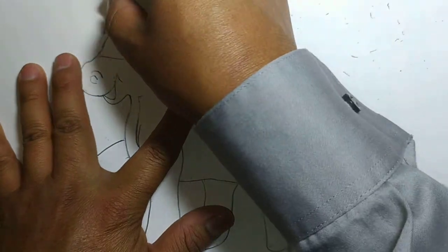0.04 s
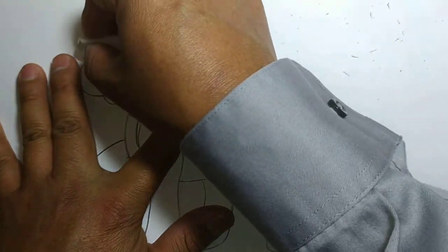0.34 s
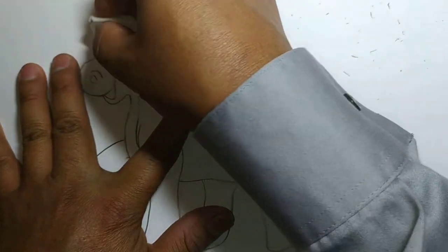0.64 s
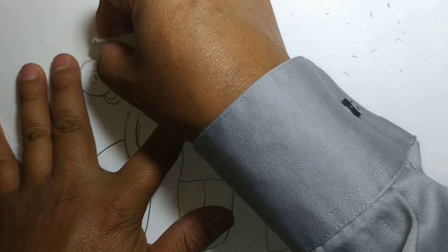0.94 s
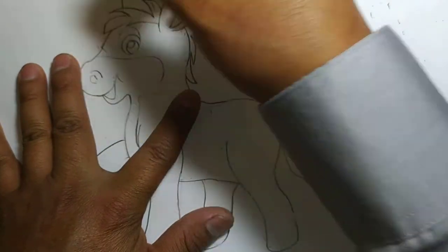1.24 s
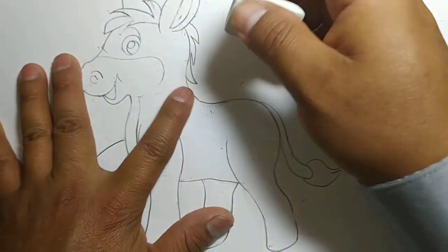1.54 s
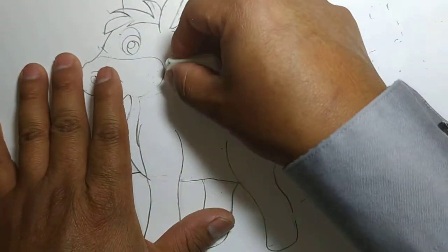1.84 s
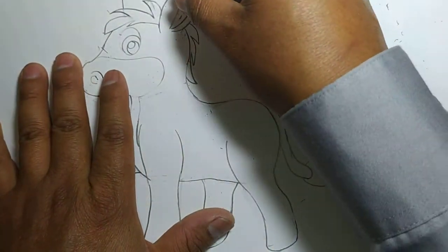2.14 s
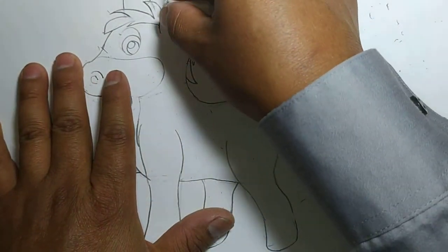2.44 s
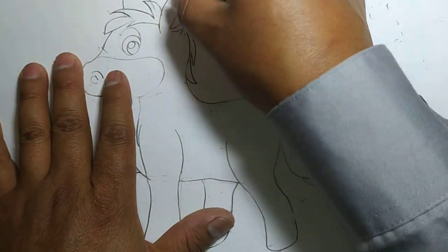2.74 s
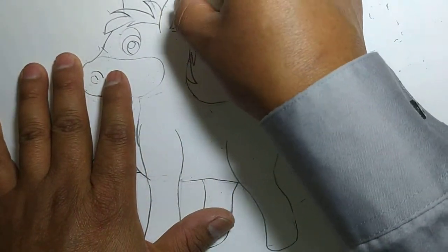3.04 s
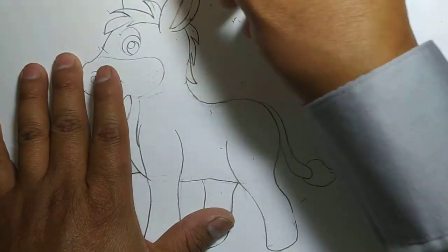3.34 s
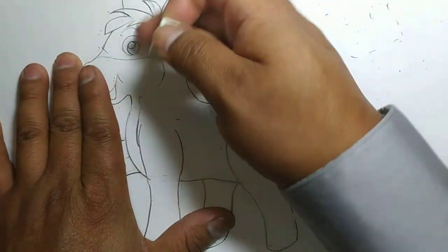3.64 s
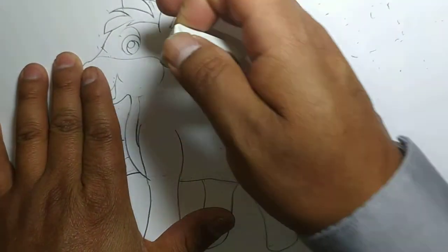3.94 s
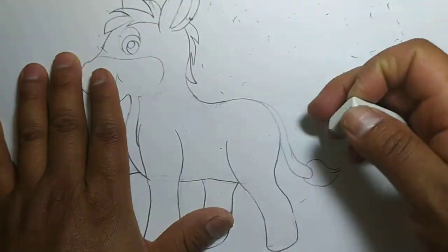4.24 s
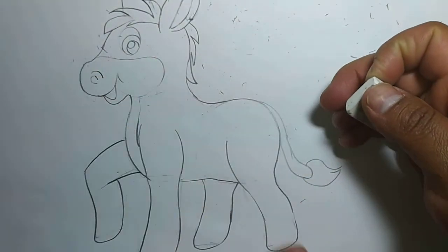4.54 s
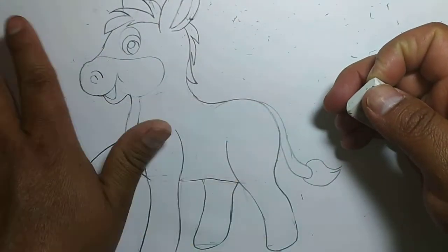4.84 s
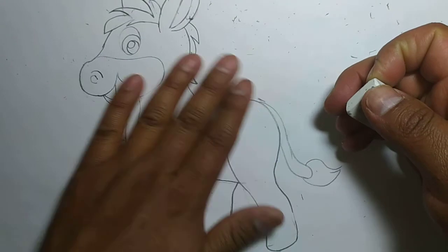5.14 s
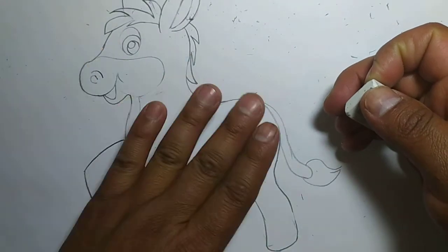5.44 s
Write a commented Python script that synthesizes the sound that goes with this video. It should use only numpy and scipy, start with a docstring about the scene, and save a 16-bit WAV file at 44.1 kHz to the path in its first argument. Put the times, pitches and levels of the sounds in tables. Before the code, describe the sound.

An eraser rubs drawing paper in short, uneven strokes, a faint scratchy hiss, while the hands bump the desk with soft low booms. Fingers then flick the crumbs off twice, the sheet ticking as it snaps flat. A flat hand sweeps the paper four times with louder, bright swishes and a muffled rub underneath. It is all heard close up in a small, quiet room.

```python
"""An eraser rubs lightly on drawing paper, close by: fibres catch and slip as a fine hiss.
The hands bump the desk, whose top booms softly, and the sheet ticks as it snaps flat.
Fingers flick the crumbs off twice, then the flat of the other hand sweeps the sheet four times,
with light brushes of skin between and a muffled rub from its heel. The room is small and quiet."""
import sys
import numpy as np
from scipy import signal
from scipy.fft import rfft, irfft, next_fast_len
from scipy.io import wavfile
from scipy.ndimage import map_coordinates

SR = 44100
rng = np.random.default_rng(int(sys.argv[2]) if len(sys.argv) > 2 else 0)


def digitize_waveform(pressure):
    """Quantize a signal to 16-bit integers and store it at the path in sys.argv[1].

    Rows of a 2-D input are taken as channels; values are limited to [-1, 1].
    """
    field = np.atleast_2d(pressure).T
    bounded = np.clip(field, -1, 1)
    quanta = np.round(bounded * 32767).astype(np.int16)
    wavfile.write(sys.argv[1], SR, quanta)


N = 251367
TIME_S = np.arange(N) / SR
RUBBER_ARCH, SKIN_ARCH = 0.37, 0.44  # lower = up to speed sooner: rubber bites, skin glides in

# skin-on-paper spectrum: freq_hz, density_db
SKIN_SPECTRUM = [(300, -44), (1500, -31), (3500, -31), (4400, -15.5), (5100, -15.5), (6400, -9.5),
                 (8000, -5.5), (9200, -3), (10500, -7), (12500, -16), (15500, -21)]


def amp(db):
    """Decibels to gain."""
    return 10 ** (np.asarray(db) / 20)


def unit(x):
    """x at rms 1."""
    return x / np.sqrt(np.mean(x ** 2) + 1e-20)


def along(points, hz):
    """Interpolate (freq_hz, value) points on a log axis."""
    freq_hz, values = np.transpose(points)
    return np.interp(np.log(hz + 1), np.log(freq_hz + 1), values)


def wobble(rate_hz):
    """Smooth random curve, rate_hz knots a second."""
    return map_coordinates(rng.standard_normal(int(N * rate_hz / SR) + 4), [TIME_S * rate_hz])


def filtered(x, response):
    """Apply the gain response(hz) to x."""
    size = next_fast_len(N + 8192)
    return irfft(rfft(x, size) * response(np.fft.rfftfreq(size, 1 / SR)), size)[..., :N]


def at_ports(pair, spectrum, right_db=0):
    """Two unrelated signals, coloured and blended as two microphone ports hear them; rms 1."""
    # left-right likeness: freq_hz, coherence
    likeness = [(30, 1), (70, 0), (140, 0.44), (290, 0.31), (640, 0.3), (1400, 0.052), (5000, 0)]
    # port imbalance: freq_hz, left_minus_right_db
    imbalance = [(200, -2), (2500, 0.5), (5000, -1), (7000, -1.5), (8800, -6.5), (10400, 3.5), (12500, 0)]

    def mid_side_gains(hz):
        angle_rad = np.arccos(np.clip(along(likeness, hz), -1, 1)) / 2
        return amp(along(spectrum, hz)) * [np.cos(angle_rad), np.sin(angle_rad)]

    def port_gains(hz):
        return amp(np.outer([0.5, -0.5], along(imbalance, hz) - right_db))

    mid, side = filtered(pair, mid_side_gains)
    return unit(filtered(np.array([mid + side, mid - side]), port_gains))


def fibres(slips_per_s, clump_db, clump_hz):
    """Paper fibres slip at random moments and let go in clumps."""
    slips = np.sqrt(rng.poisson(slips_per_s / SR, N)) * rng.standard_normal((2, N))
    return slips * amp(clump_db * wobble(clump_hz))


def rub_gains(rows, arch):
    """Each rub speeds up and stops in one arch; one gain curve per dB column."""
    gains = np.zeros((len(rows[0]) - 2, N))
    for start_s, length_s, *levels_db in rows:
        on = (TIME_S > start_s) & (TIME_S < start_s + length_s)
        speed = np.abs(np.sin(np.pi * (TIME_S[on] - start_s) / length_s)) ** arch
        gains[:, on] += np.outer(amp(levels_db), speed)
    return gains


def eraser():
    """Rubber hisses on the fibres, drags the sheet and judders against the desk."""
    # strokes, before mix gains: start_s, length_s, hiss_db, drag_db, scrape_db
    strokes = [(0.0, 0.022, -55.5, -80, -78), (0.056, 0.057, -68, -90, -94),
               (0.262, 0.059, -61.5, -72.5, -73), (0.353, 0.061, -63.5, -78, -74.5),
               (0.449, 0.036, -67, -76, -78), (0.487, 0.047, -72, -79.5, -70),
               (0.752, 0.073, -76.5, -79, -70.5), (0.896, 0.035, -79, -84, -80.5),
               (0.993, 0.082, -74.5, -78, -79), (1.112, 0.034, -70, -80, -90), (1.165, 0.07, -71, -89, -96),
               (1.814, 0.066, -60, -69.5, -76.5), (1.876, 0.11, -67, -82.5, -100),
               (2.338, 0.081, -64.5, -76, -68), (2.432, 0.081, -71.5, -78.5, -79.5),
               (2.509, 0.035, -70, -82, -89), (2.587, 0.026, -64.5, -77, -65), (2.612, 0.06, -71, -85, -99),
               (2.844, 0.018, -72.5, -87, -82), (2.924, 0.061, -70.5, -73.5, -73.5),
               (3.033, 0.083, -69.5, -78, -74), (3.13, 0.082, -64, -71.5, -79.5),
               (3.215, 0.052, -58.5, -66, -85)]
    # rubber hiss, sheet drag and desk scrape spectra: freq_hz, density_db
    hiss_spectrum = [(1000, -47), (3000, -15.5), (4500, -14), (5500, -11.5), (7500, -8.5), (9200, -1),
                     (10500, -6), (12000, -20), (15500, -25)]
    drag_spectrum = [(500, -10), (1200, -4), (1530, 0.5), (1900, -5), (2500, -3.5), (2900, 0.5), (3700, -3),
                     (4550, -4.5), (6000, -6), (15000, -38)]
    scrape_spectrum = [(100, -17), (250, -4), (400, -5), (620, -12), (850, 4.5), (940, -6.5), (1030, -4),
                       (1300, -15), (2500, -15.5), (6000, -47)]
    hiss, drag, scrape = rub_gains(strokes, RUBBER_ARCH)
    paper = at_ports(fibres(slips_per_s=12000, clump_db=2.0, clump_hz=74), hiss_spectrum, right_db=2.0)
    sheet = at_ports(fibres(slips_per_s=5200, clump_db=1.2, clump_hz=160), drag_spectrum)
    judder = at_ports(fibres(slips_per_s=1800, clump_db=2.5, clump_hz=98), scrape_spectrum)
    return hiss * paper + amp(4.0) * drag * sheet + amp(5.0) * scrape * judder


def hush():
    """Low room rumble and faint microphone hiss."""
    # noise floor: freq_hz, density_db
    floor_spectrum = [(12, -33), (20, 0.5), (49, -2), (64, -9.5), (101, -11.5), (126, -11), (404, -19),
                      (519, -22.5), (811, -27), (881, -27), (958, -29), (1270, -30.5), (6020, -36),
                      (8640, -31.5), (15500, -42.5)]
    level_db = -64 + 0.19 * wobble(rate_hz=4.3)
    return amp(level_db) * at_ports(rng.standard_normal((2, N)), floor_spectrum)


def room(x):
    """The walls return a short tail, different at each port."""
    # room decay: freq_hz, t60_s
    decay = [(150, 0.35), (1000, 0.39), (5000, 0.16), (14000, 0.15)]
    predelay_s = 0.005
    hz, t, bins = signal.stft(rng.standard_normal((2, SR // 2)), SR, nperseg=256)
    _, tail = signal.istft(bins * amp(-60 * t / along(decay, hz)[:, None]), SR, nperseg=256)
    tail = np.pad(tail / np.linalg.norm(tail[0]), ((0, 0), (round(predelay_s * SR), 0)))
    return signal.fftconvolve(x, tail, axes=1)[:, :N]


def desk_bumps():
    """Hands ring the desk top: soft contact reaches only the lowest modes, a quick one adds a thud."""
    # bumps, harder = higher cutoff: start_s, level_db, cutoff_hz, rise_s
    bumps = [(0.268, -43, 180, 0.0059), (.281, -30.5, 138, 0.016), (.456, -44.5, 234, 0.011),
             (.505, -51.5, 210, 0.0082), (.72, -36.5, 281, 0.0015), (1.521, -50, 204, 0.031),
             (1.763, -54, 222, 0.0025), (2.285, -52, 195, 0.0046), (2.359, -42.5, 220, 0.0081),
             (2.595, -55.5, 269, 0.0038), (2.848, -47, 180, 0.0039), (3.048, -53.5, 228, 0.0095),
             (3.574, -41.5, 225, 0.0028), (3.812, -31, 550, 0.0011), (3.824, -43, 260, 0.0018),
             (4.614, -47.5, 218, 0.03), (4.668, -39.5, 156, 0.0093), (5.044, -40.5, 211, 0.0064),
             (5.443, -29, 172, 0.011)]
    # desk top modes: pitch_hz, level_db, t60_s
    modes = [(138.1, 3.5, 0.35), (161.6, 0.5, 0.26), (169.6, 4, 0.14), (198.6, 0, 0.37),
             (230.2, -15.5, 0.65), (260.6, 0, 0.2), (305.8, -4, 0.19), (372, -1.5, 0.2), (413, -14.5, 0.35),
             (479, -20, 0.21), (513, -12.5, 0.12), (574, -14, 0.098), (735, -9.5, 0.17), (847, 3, 0.13),
             (1033, 6.5, 0.085), (1140, -14, 0.063)]
    out = np.zeros(N + SR)
    t = np.arange(SR // 2) / SR
    pitch_hz, mode_db, t60_s = np.transpose(modes)[:, :, None]
    polarity = (-1) ** np.arange(len(modes))[:, None]  # neighbours oppose, so the boom swells
    ringing = polarity * amp(-60 * t / t60_s) * np.sin(2 * np.pi * pitch_hz * t)
    for start_s, level_db, cutoff_hz, rise_s in bumps:
        weights = amp(mode_db + rng.normal(0, 0.96, pitch_hz.shape))
        weights /= np.sqrt(1 + (pitch_hz / cutoff_hz) ** 6.3)
        # a hard blow ends before the lowest modes get going
        weights *= pitch_hz ** 2 / (pitch_hz ** 2 + (0.37 * cutoff_hz) ** 2)
        boom = (weights / np.linalg.norm(weights) * ringing).sum(axis=0)
        band_hz = [0.037 * cutoff_hz + 70, 0.66 * cutoff_hz + 130]
        bandpass = signal.butter(2, band_hz, "band", fs=SR, output="sos")
        noise = unit(signal.sosfilt(bandpass, rng.standard_normal(len(t))))
        thud = amp(-2 - 60 * t / 0.082) * noise / (1 + rise_s / 0.01)
        onset = 1 - np.exp(-t / rise_s)
        out[round(start_s * SR):][:len(t)] += amp(level_db) * (boom + thud) * onset
    return out[:N]


def sheet_ticks():
    """The touched sheet snaps flat against the desk in a burst of a few milliseconds."""
    # ticks, before mix gains: start_s, crack_db, slap_offset_db
    ticks = [(0.7186, -44, -0.5), (1.3963, -45, -15), (1.499, -61, -16), (3.5729, -29, -11),
             (3.8107, -25, -14), (4.141, -42, -14), (4.1517, -41.5, -13), (4.608, -34, -24),
             (4.833, -51, 5), (5.444, -39, -10)]
    # paper-on-desk slap: freq_hz, density_db
    slap_spectrum = [(500, 6), (1400, 11.5), (2500, -14), (3700, 6.5), (4500, 9), (6000, -5), (15000, -30)]
    crack_t60_s = 0.029
    crack, slap = np.zeros((2, N))
    for start_s, crack_db, slap_offset_db in ticks:
        age_s = np.abs(TIME_S - start_s)
        burst = (TIME_S >= start_s) * amp(crack_db - 60 * age_s / crack_t60_s)
        crack += burst
        slap += burst * amp(slap_offset_db - 60 * age_s / 0.084)  # extra damping by the desk
    crack_noise = at_ports(rng.standard_normal((2, N)), SKIN_SPECTRUM, right_db=1.5)
    slap_noise = at_ports(rng.standard_normal((2, N)), slap_spectrum, right_db=1.5)
    return amp(-12.0) * crack * crack_noise + amp(-7.5) * slap * slap_noise


def glancing(x, delay_s, sway, echo_db):
    """Echoes off palm, cuff and desk; the paths change as the hand moves, so notches drift."""
    out = x.copy()
    for path in (1, 2, 3):
        for port in range(len(x)):
            lag_s = path * delay_s * np.exp(sway * wobble(rate_hz=5))
            out[port] += amp(echo_db) * map_coordinates(x[port], [(TIME_S - lag_s) * SR], order=3)
    return unit(out)


def hand():
    """Skin slides on the sheet: speed makes the bright hiss, pressure the duller rasp."""
    # light brushes, before mix gains: start_s, length_s, hiss_db, rasp_db
    brushes = [(1.468, .055, -70, -79.5), (1.55, 0.13, -65.5, -82), (1.665, 0.12, -69, -81.5),
               (2.05, 0.14, -69, -80.5), (3.26, 0.2, -76, -88), (3.44, 0.21, -73, -82.5),
               (3.62, 0.23, -70.5, -80.5), (3.85, 0.18, -71.5, -79), (4.18, 0.093, -65, -75.5),
               (4.268, 0.061, -56, -71), (4.322, 0.093, -58.5, -69.5), (4.52, 0.087, -69, -79),
               (4.777, 0.033, -47, -65), (4.79, 0.2, -72.5, -79.5), (4.973, 0.072, -63, -73),
               (5.205, 0.1, -68.5, -80), (5.357, 0.061, -63, -73.5), (5.605, 0.083, -74, -80.5)]
    # pressed and light touch spectra: freq_hz, density_db
    rasp_spectrum = [(150, -5), (350, 0.5), (620, -9), (870, 0.5), (1100, -11), (1500, -7.5), (2000, -0.5),
                     (2850, 2.5), (3550, 2), (4500, 0), (7000, -1.5), (15000, -26)]
    sheen_spectrum = [(2000, -43), (6500, -16.5), (8000, -11), (9100, 0.5), (10300, -4.5), (11500, -17),
                      (15500, -36)]
    hiss, rasp = rub_gains(brushes, SKIN_ARCH) + sweep_gains()
    bright = at_ports(fibres(slips_per_s=80000, clump_db=0.35, clump_hz=190), SKIN_SPECTRUM)
    bright = glancing(bright, delay_s=0.0009, sway=0.1207, echo_db=-7.5)
    dull = at_ports(fibres(slips_per_s=9000, clump_db=1.85, clump_hz=110), rasp_spectrum)
    dull = glancing(dull, delay_s=0.000709, sway=0.158, echo_db=-3.0)
    sheen = at_ports(rng.standard_normal((2, N)), sheen_spectrum, right_db=3.5)
    lightness = 1 / (1 + hiss / amp(-63.5))  # a slow touch meets only fibre tips: a narrow sheen
    treble = np.sqrt(1 - lightness) * bright + np.sqrt(lightness) * sheen
    return amp(2.0) * hiss * treble + amp(5.0) * rasp * dull


def sweep_gains():
    """The hand lands, gathers speed and lifts ever faster; gain curves of hiss and rasp."""
    # two flicks, four sweeps, before mix gains:
    # start_s, attack_s, slide_s, release_s, hiss_db, rasp_db, rasp_rise_db
    sweeps = [(3.57, 0.013, 0.062, 0.022, -43, -59, 15), (3.823, 0.0083, 0.041, .022, -42.5, -59.5, -3.5),
              (4.355, 0.056, .11, 0.099, -34.5, -52, 21.5), (4.607, 0.0027, .14, 0.047, -36, -56.5, 6.5),
              (5.03, 0.016, .13, 0.077, -36.5, -58.5, -1), (5.431, 0.014, 0.12, 0.081, -37, -61, -0.5)]
    swell_db_per_s, release_db, release_power = 74, 37.5, 1.9
    hiss, rasp = np.zeros((2, N))
    for start_s, attack_s, slide_s, release_s, hiss_db, rasp_db, rasp_rise_db in sweeps:
        t = TIME_S - start_s
        landing = np.sin(np.pi / 2 * np.clip(t / attack_s, 0, 1)) ** 2
        lift = (np.maximum(t - slide_s, 0) / release_s) ** release_power
        contact = landing * amp(-release_db * lift)
        remaining_s = np.clip(slide_s - t, 0, slide_s)
        hiss += contact * amp(hiss_db - swell_db_per_s * remaining_s)
        rasp += contact * amp(rasp_db - rasp_rise_db * remaining_s / slide_s)
    return np.array([hiss, rasp])


def heel():
    """The hand's soft heel drags under the arm's weight: a low, muffled rub."""
    # drags: start_s, length_s, level_db
    drags = [(4.43, 0.118, -64.5), (4.65, 0.5, -67)]
    # flesh on paper: freq_hz, density_db
    flesh_spectrum = [(120, -6.5), (260, -4.5), (390, 1), (520, -9), (850, -15), (1500, -12), (3000, -24),
                      (8000, -45)]
    slips = fibres(slips_per_s=2400, clump_db=0.5, clump_hz=67)
    return rub_gains(drags, SKIN_ARCH) * at_ports(slips, flesh_spectrum)


def scene():
    """Rubs, bumps and sweeps, close by in a quiet room."""
    paper = eraser() + hand() + heel() + sheet_ticks()
    bumps = desk_bumps() * amp([[-0.7], [0.7]])  # slightly right
    return paper + amp(-8.5) * room(paper) + bumps + amp(-12.5) * room(bumps) + hush()


def record(dry):
    """The camera's band limit."""
    top_hz = 15800
    return filtered(dry, lambda hz: hz < top_hz)


dry = scene()
out = record(dry)
digitize_waveform(out)
```